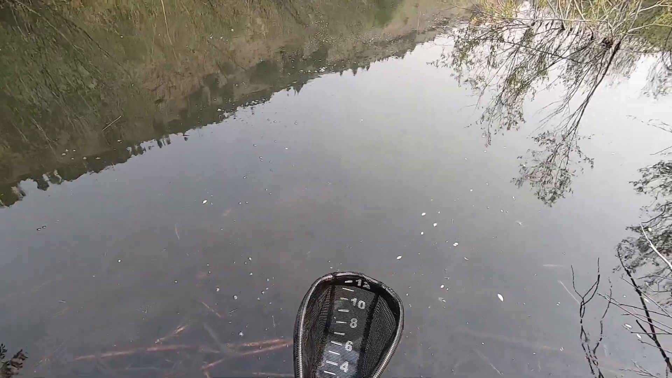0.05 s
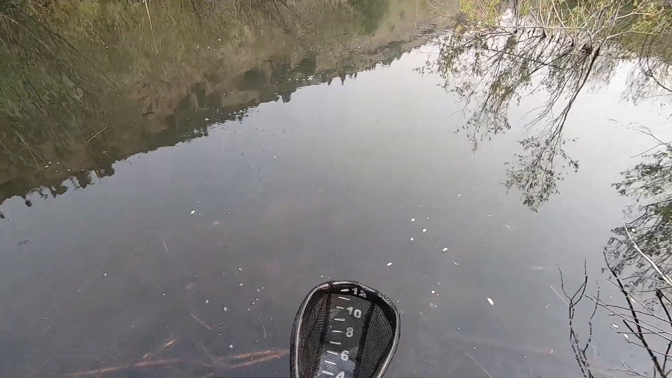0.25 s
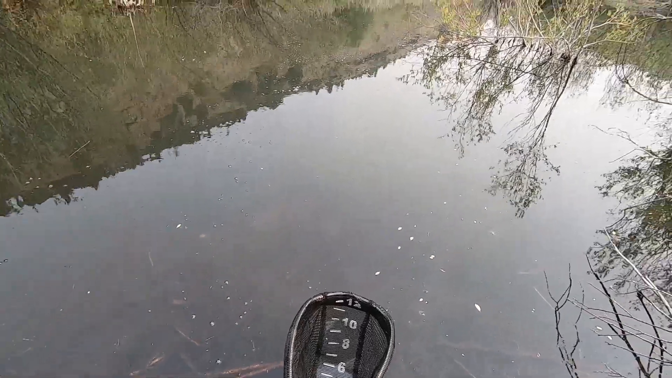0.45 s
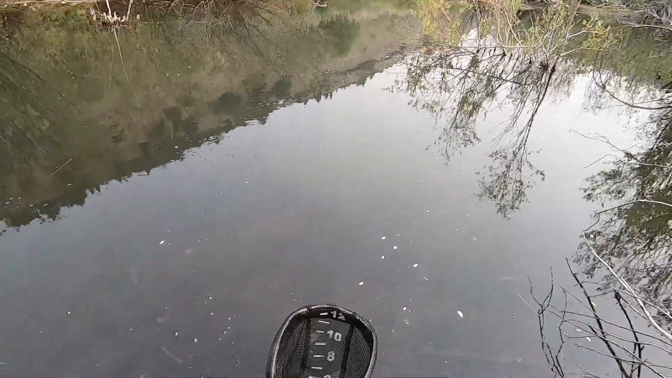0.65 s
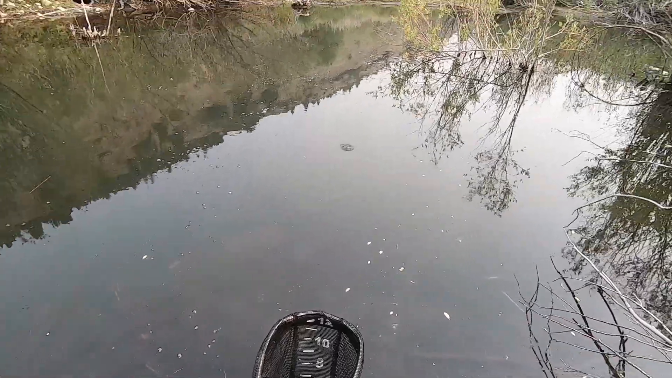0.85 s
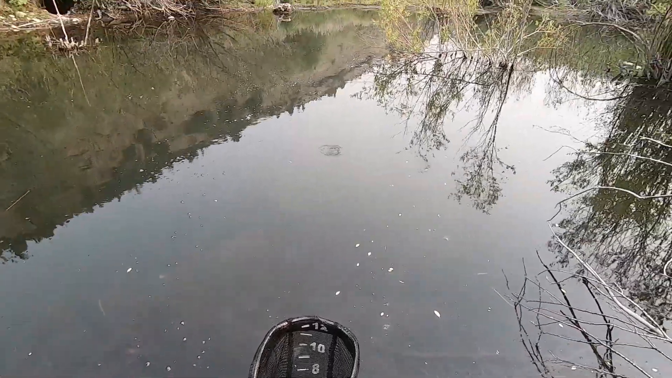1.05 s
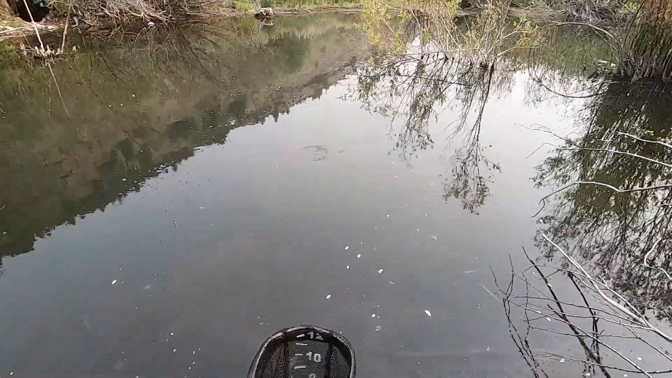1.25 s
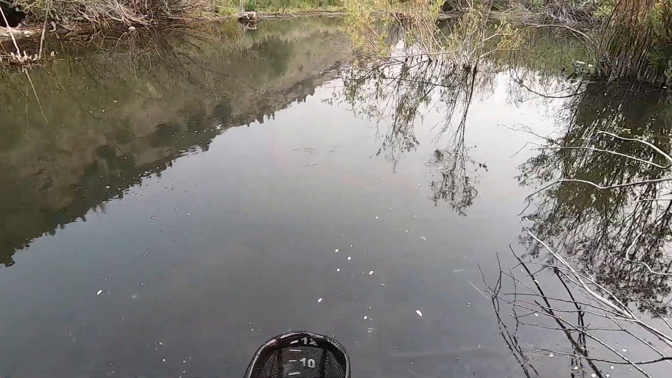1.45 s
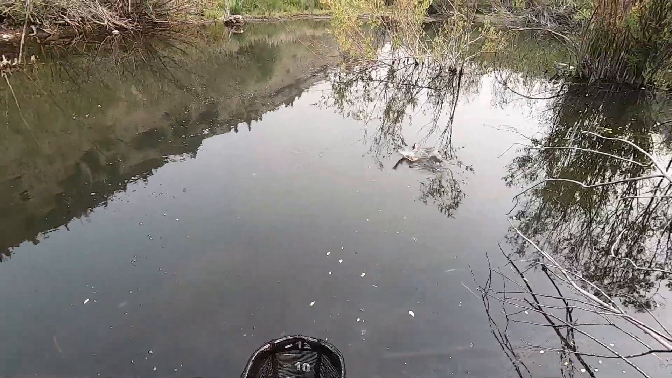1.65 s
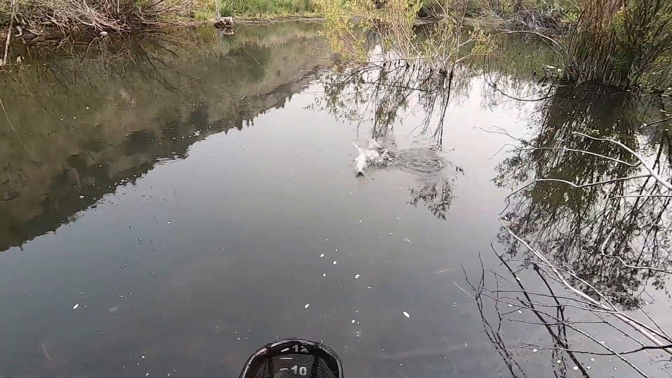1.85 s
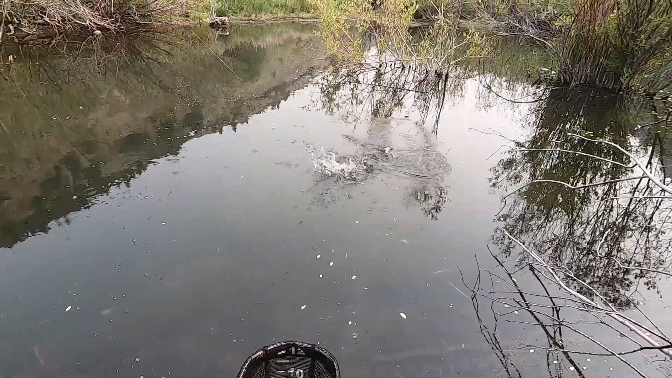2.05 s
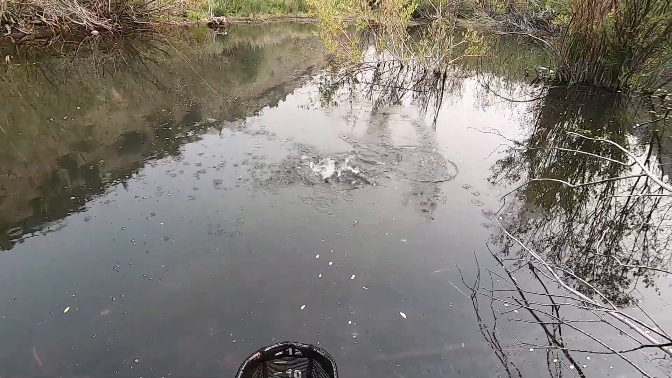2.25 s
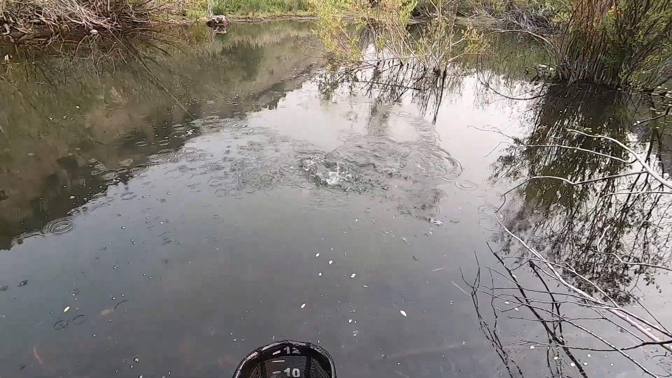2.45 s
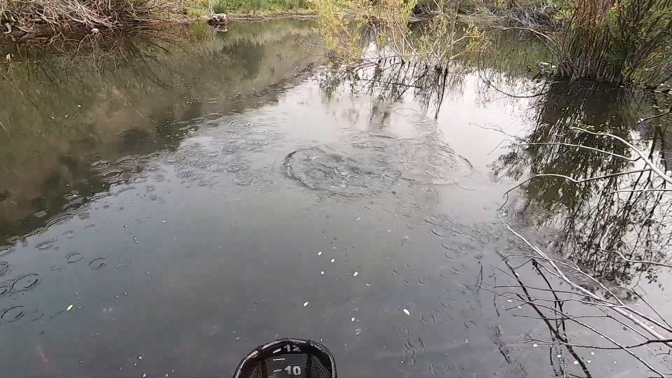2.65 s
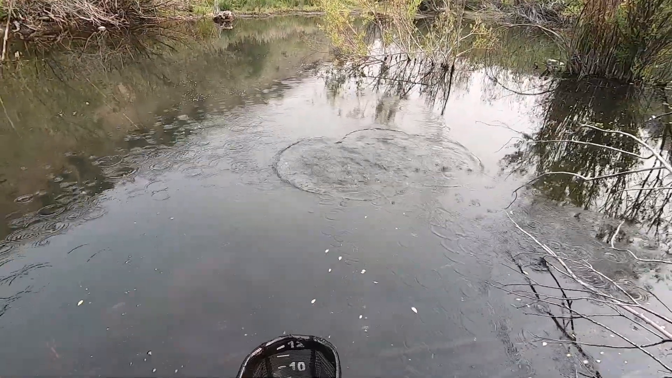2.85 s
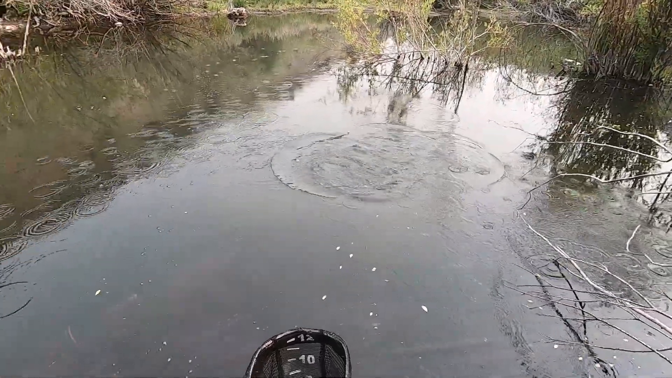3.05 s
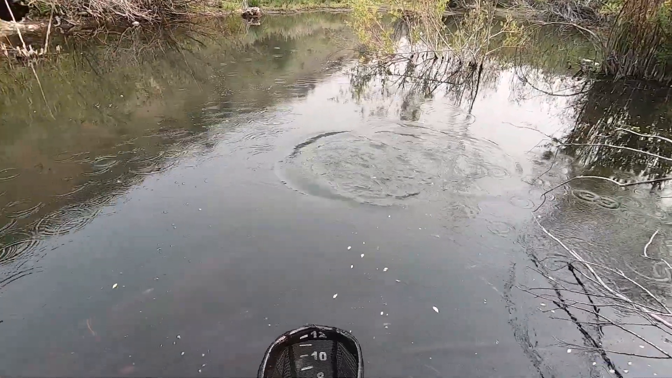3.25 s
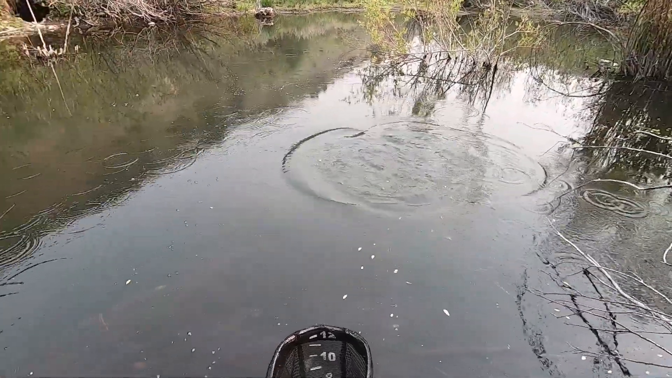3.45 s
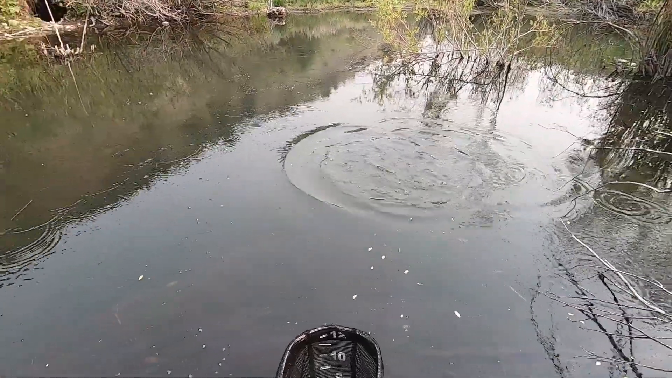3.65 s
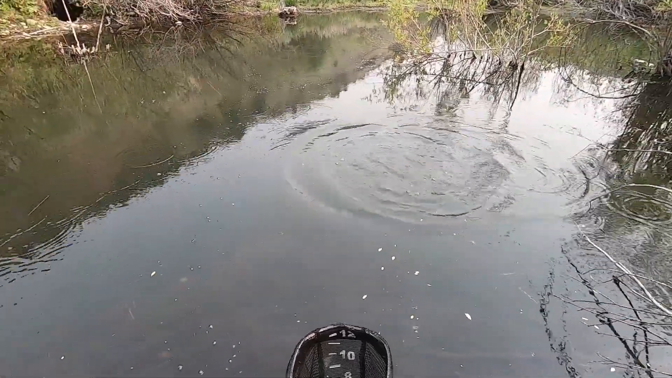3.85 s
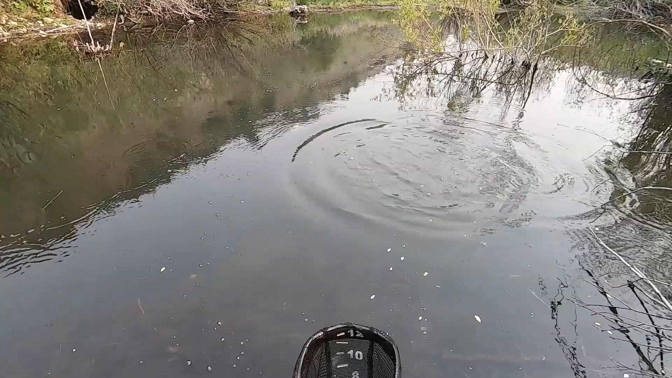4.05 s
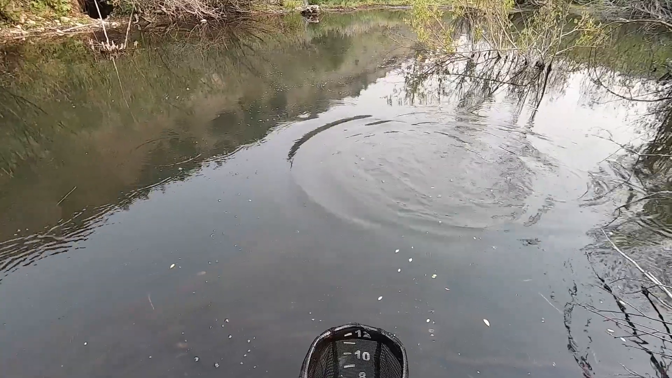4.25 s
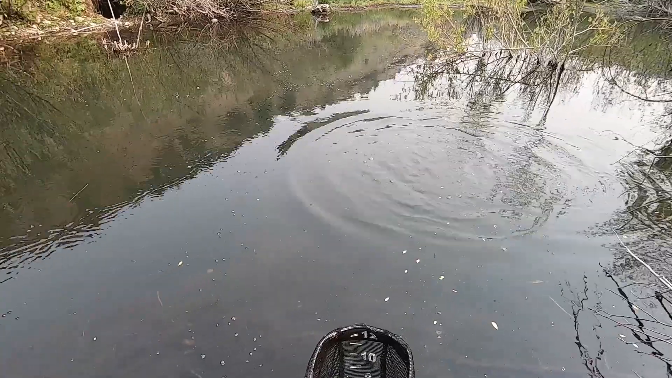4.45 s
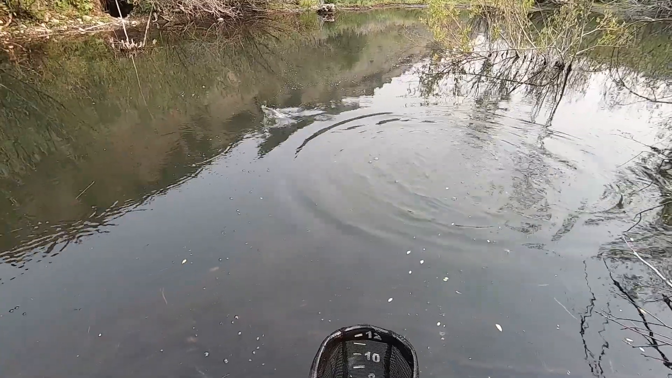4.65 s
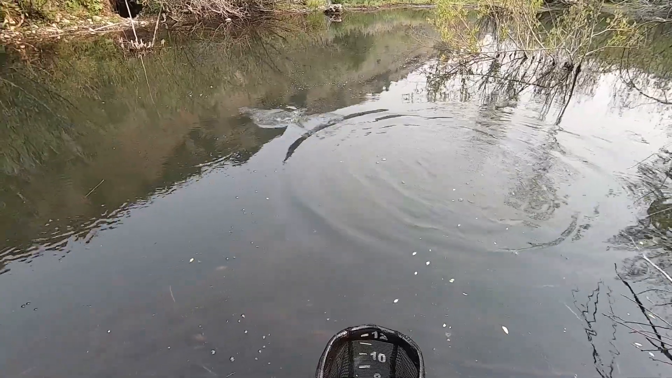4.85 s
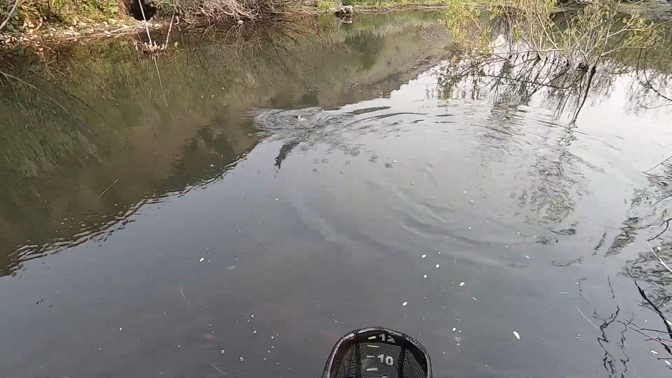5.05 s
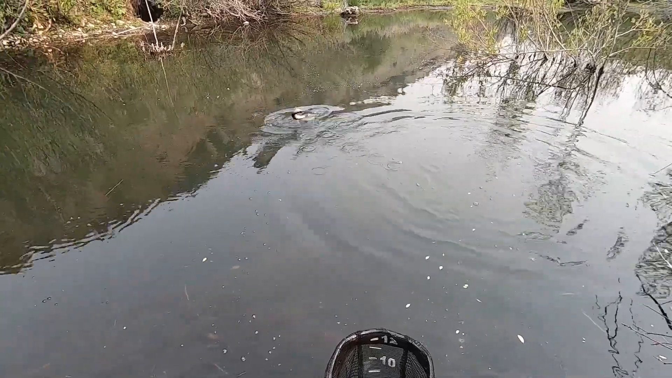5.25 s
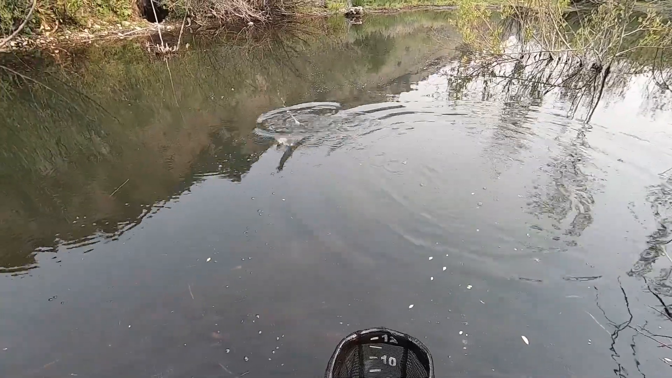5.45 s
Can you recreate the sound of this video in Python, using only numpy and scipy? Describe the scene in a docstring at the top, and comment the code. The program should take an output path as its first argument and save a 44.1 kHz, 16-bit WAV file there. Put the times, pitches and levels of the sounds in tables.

```python
"""A hooked fish thrashes at the surface of a small creek: ringing air pockets plop, noisy drops splash and patter.
An angler's strike snaps the tackle tight close by: a chord of short rings with a bright noise rattle.
A sleeve rustles and moving air rumbles on the microphone, both as shaped noise; the fish swirls once more, softer.
Far birds whistle in gliding tones, and the creek trickles between reedy banks as coloured noise and bubbles."""
import sys
import numpy as np
from scipy import signal
from scipy.fft import rfft, irfft, next_fast_len
from scipy.io import wavfile

SR = 44100
rng = np.random.default_rng(int(sys.argv[2]) if len(sys.argv) > 2 else 0)


def digitize_waveform(pressure):
    """Quantize a signal to 16-bit integers and store it at the path in sys.argv[1].

    Rows of a 2-D input are taken as channels; values are limited to [-1, 1].
    """
    field = np.atleast_2d(pressure).T
    bounded = np.clip(field, -1, 1)
    quanta = np.round(bounded * 32767).astype(np.int16)
    wavfile.write(sys.argv[1], SR, quanta)


N = 242707
TIME = np.arange(N) / SR
CUTOFF_HZ = 16000


def from_db(db):
    """Decibels to gain."""
    return 10 ** (np.asarray(db) / 20)


def rms_one(x):
    """Scale to rms 1."""
    return x / np.sqrt(np.mean(x ** 2) + 1e-20)


def add(out, s, sound):
    """Mix a sound in at time s."""
    at = max(round(s * SR), 0)
    out[at:at + len(sound)] += sound[:max(N - at, 0)]


def dying(t, t60):
    """Falls by 60 dB in t60."""
    return np.exp(-np.log(1000) * t / t60)


def colour(x, spectrum):
    """Filter x through a (Hz, dB) curve that falls 24 dB per octave beyond its ends; rms 1."""
    hz, db = np.transpose(spectrum)
    size = next_fast_len(N)
    octave = np.log2(np.maximum(np.fft.rfftfreq(size, 1 / SR), 1))
    outside = np.abs(octave - np.clip(octave, np.log2(hz[0]), np.log2(hz[-1])))
    gain = from_db(np.interp(octave, np.log2(hz), db) - 24 * outside)
    return rms_one(irfft(rfft(x, size) * gain, size)[:N])


def coloured_noise(spectrum):
    """Steady random noise through a (Hz, dB) curve; rms 1."""
    return colour(rng.standard_normal(N), spectrum)


def drops(per_s, spread_db, cycles, low_hz, high_hz, count=28):
    """Random drops of uneven size, each swelling and ringing at one of count bubble pitches; rms 1."""
    sizes = from_db(spread_db * np.minimum(rng.exponential(1, N), 3))
    sizes = sizes * rng.choice([-1, 1], N)
    clicks = sizes * (rng.random(N) < per_s / SR)
    dealt = rng.integers(0, count, N)
    out = np.zeros(N)
    for k, hz in enumerate(np.geomspace(low_hz, min(high_hz, CUTOFF_HZ), count)):
        r = dying(1 / SR, cycles / hz)
        w = 2 * np.pi * hz / SR
        resonance = [(1 - r * r) / 2, 0, -(1 - r * r) / 2, 1, -2 * r * np.cos(w), r * r]
        # two in a row make the ring swell before it dies; the tiny offset keeps the filter from stalling
        out += signal.sosfilt([resonance, resonance], clicks * (dealt == k) + 1e-18)
    return rms_one(out)


def scatter(x, t60, count=60):
    """Blurs a sound into many weak delayed copies, with about the energy of the sound itself."""
    delays = rng.uniform(.004, t60, count)
    echoes = np.zeros(int(t60 * SR) + 1)
    echoes[(delays * SR).astype(int)] = dying(delays, t60) * rng.standard_normal(count)
    return signal.fftconvolve(x, echoes / np.linalg.norm(echoes))[:N]


def swell(s, hold_s, attack_s, release_s):
    """Grows up to time s, holds at 1, then fades; attack and release are time constants."""
    growth = np.minimum(TIME - s, 0) / attack_s
    fade = np.maximum(TIME - s - hold_s, 0) / release_s
    return np.exp(growth - fade)


def spells(rows, attack_s, release_s, rest_db):
    """Gain over time for (s, length s, dB) rows: the strongest spell prevails, above a resting level."""
    gains = [from_db(db) * swell(s, length, attack_s, release_s) for s, length, db in rows]
    return np.hypot(from_db(rest_db), np.max(gains, axis=0))


# air pockets closing in the water: (time [s], relative peak level [dB], starting pitch [Hz], t60 [s])
PLOPS = [(1.097, -33.5, 770, 0.055), (1.578, -33.5, 794, 0.031), (1.684, -31.5, 1127, 0.065),
         (1.864, -31.5, 926, .04), (1.874, -25.5, 1400, .02), (1.974, -15.5, 925, .024),
         (2.089, -31.5, 1105, .07), (2.155, -25.5, 980, 0.047), (2.178, -15, 1087, 0.025),
         (2.185, -27, 189, .02), (2.218, -26.5, 302, 0.099), (2.237, -24.5, 465, 0.024),
         (2.252, -18.5, 650, 0.026), (2.274, -27, 720, .045), (2.2995, -20, 650, 0.024),
         (2.3, -30.5, 257, 0.089), (2.31, -20, 1310, .017), (2.319, -15.5, 950, .02),
         (2.324, -23.5, 750, 0.05), (2.4, -27, 514, 0.063), (2.424, -23, 760, 0.028),
         (2.868, -37.5, 580, 0.084), (4.008, -35.5, 602, 0.077), (4.69, -36, 535, 0.062),
         (4.7275, -24, 800, 0.0094), (4.728, -36, 326, .14)]
PLOP_RISE_OCT_PER_S = 5.4


def plops(closing_share=0.023):
    """A trapped pocket of air rings and rises in pitch as it nears the surface; long ringers close more slowly."""
    out, t = np.zeros(N), TIME[:SR // 6]
    for s, db, hz, t60 in PLOPS:
        pitch = hz * 2 ** (PLOP_RISE_OCT_PER_S * t)
        envelope = (1 - np.exp(-t / (closing_share * t60))) ** 2 * dying(t, t60)
        ring = np.sin(2 * np.pi * np.cumsum(pitch) / SR)
        add(out, s, from_db(db - 2) * envelope / envelope.max() * ring)
    return out


# tail slaps that throw water: (time [s], relative level [dB], fine mist relative to the slap [dB])
SLAPS = [(1.618, -40.5, -23), (1.676, -40, -20), (1.722, -38, -12), (1.8727, -28, -4), (1.974, -34, 5),
         (2.116, -33, -12), (2.154, -43.5, 9.5), (2.1948, -40, -1), (2.215, -37, -10), (2.3, -30.5, 0),
         (2.334, -39.5, 11), (2.4234, -26, 1.5), (2.4667, -33.5, -4), (2.561, -37, 2), (4.722, -36.5, -10),
         (4.797, -42.5, -19), (4.89, -39.5, -9), (5.154, -41, -10)]
# bouts of thrashing that throw spray: (time [s], length [s], relative level [dB])
THRASHES = [(1.67, .2, -50.5), (1.95, 0.16, -44), (2.2, .25, -42), (4.68, 0.21, -55.5), (5.3, 0.22, -55.5)]
# tone curve of coarse splash, mist and patter: (frequency [Hz], level [dB])
SPRAY = [(250, -13), (600, 1.5), (1200, 5), (1800, 2), (2500, 6), (3700, -0.5), (5000, -2.5), (8000, 1),
         (11000, -5), (16000, -14)]
SLAP_T60_S = .042
# time constants: drops go up quickly and take longer to fall back; a little patter always goes on
SPRAY_ATTACK_S, SPRAY_RELEASE_S, RESTING_PATTER_DB = 0.064, 0.14, -60.5


def splashing():
    """Slaps tear the surface into coarse bubbles and fine mist; thrown drops patter and churned water gurgles."""
    slap, spray, t = np.zeros(N), np.zeros(N), TIME[:SR // 5]
    for s, db, mist_db in SLAPS:
        burst = from_db(db) * (1 - np.exp(-t / 0.00026)) * dying(t, SLAP_T60_S)
        add(slap, s, burst)
        add(spray, s, from_db(mist_db) * burst)
    coarse = colour(drops(per_s=6500, spread_db=2.0, cycles=8.5, low_hz=348, high_hz=4920), SPRAY)
    mist = colour(drops(per_s=7200, spread_db=3.5, cycles=3.8, low_hz=4500, high_hz=14300), SPRAY)
    patter = colour(drops(per_s=2600, spread_db=5.2, cycles=14, low_hz=900, high_hz=15000, count=48), SPRAY)
    plips = drops(per_s=420, spread_db=5, cycles=17, low_hz=1200, high_hz=4600)
    churn = drops(per_s=700, spread_db=3.5, cycles=10.5, low_hz=396, high_hz=1400)
    falling = from_db(-1.0) * patter + from_db(-6) * plips + from_db(-1.5) * churn + from_db(-10.5) * mist
    thrashing = spells(THRASHES, SPRAY_ATTACK_S, SPRAY_RELEASE_S, RESTING_PATTER_DB)
    return from_db(1.0) * slap * coarse + from_db(-4) * spray * mist + thrashing * falling


# snaps and ticks of the tackle: (time [s], relative level [dB], brightness [dB per octave])
SNAPS = [(1.208, -43.5, 11), (1.7602, -22.5, 0), (1.8271, -19, 9.5), (1.9073, -35.5, 6), (1.9403, 1, 0.5),
         (2.1149, -23.5, 3.5), (2.845, -38, -3), (3.1925, -34.5, 2), (3.2272, -42, 0), (3.232, -31.5, -4),
         (3.3593, -36.5, -2), (3.385, -38, 14), (3.399, -40, 11)]
# what the tackle rings with: (frequency [Hz], relative level [dB], t60 [s])
TACKLE_MODES = [(178, -32, 0.014), (450, -32, 0.023), (774, -18, 0.0069), (1290, -32, 0.016),
                (2376, -16.5, 0.012), (3010, -18.5, 0.008), (3890, -0.5, 0.0047), (5010, -2.5, 0.0053),
                (6130, -2, 0.0048), (7240, -5.5, 0.006), (8310, -3.5, 0.0048), (9400, -7.5, 0.0059),
                (10570, -9, 0.0044), (12060, -17, 0.0079), (13060, -32, 0.0037), (14500, -21, .0045)]
# tone curve of the rattle: (frequency [Hz], level [dB])
RATTLE = [(1500, -18), (3000, -11.5), (5000, -10), (8000, -5), (11000, -14.5), (16000, -22)]
RATTLE_DB, RATTLE_T60_S = -23, 0.15   # after a 0 dB snap
# share of a snap's level that the rattle follows; drop in snap level that halves the rattle's length
RATTLE_FOLLOWS, RATTLE_HALVES_DB = 0.51, 22


def tackle():
    """Each snap runs down the rod, treble ahead of bass; a harder one leaves a louder, longer bright rattle."""
    out, shake, t = np.zeros(N), np.zeros(N), TIME[:SR // 4]
    for s, db, brightness_db in SNAPS:
        for k, (hz, mode_db, t60) in enumerate(TACKLE_MODES):
            travel_s = .00055 * np.sqrt(4000 / max(hz, 2000))
            gain = from_db(db + mode_db + brightness_db * np.log2(hz / 6000))
            ring = np.sin(2 * np.pi * hz * t) * dying(t, t60) * (1 - np.exp(-t / 0.00033))
            add(out, s + travel_s, 2 * (-1) ** k * gain * ring)   # neighbouring modes alternate in sign
        rattle_t60 = RATTLE_T60_S * 2 ** (db / RATTLE_HALVES_DB)
        envelope = dying(t, rattle_t60) * (1 - np.exp(-t / 0.0012))
        add(shake, s, from_db(RATTLE_DB + RATTLE_FOLLOWS * db) * envelope)
    return out + shake * coloured_noise(RATTLE)


# strokes of the sleeve: (peak time [s], attack time constant [s], level [dB])
BRUSHES = [(3.37, .13, -48.5), (3.456, 0.028, -37), (3.628, 0.03, -42)]
# tone curve of the cloth: (frequency [Hz], level [dB])
SLEEVE = [(2000, -11), (3500, -10), (5300, 6), (7000, -3), (9000, 1), (11300, 4.5), (13000, -9),
          (16000, -6)]
BRUSH_HOLD_S, BRUSH_RELEASE_S = 0.0057, 0.017   # each stroke stops short


def sleeve_rustle():
    """Rubbing cloth is bright noise that grows with each stroke and stops short."""
    rubbing = sum(from_db(db) * swell(s, BRUSH_HOLD_S, attack_s, BRUSH_RELEASE_S)
                  for s, attack_s, db in BRUSHES)
    return rubbing * coloured_noise(SLEEVE)


# gusts on the microphone: (time [s], length [s], level [dB])
GUSTS = [(1.5, 0.2, -33.5), (1.88, 0.33, -27.5), (2.52, 0.62, -25), (3.35, 0.044, -35)]
# tone curve of their rumble: (frequency [Hz], level [dB])
RUMBLE = [(10, -3), (16, 1.5), (25, -17), (40, -20.5), (63, -43.5), (100, -37.5), (200, -92)]
GUST_ATTACK_S, GUST_RELEASE_S, CALM_AIR_DB = 0.12, 0.049, -47.5   # time constants; level between gusts


def moving_air():
    """Air pushing on the microphone is deep noise that swells with each gust."""
    return spells(GUSTS, GUST_ATTACK_S, GUST_RELEASE_S, CALM_AIR_DB) * coloured_noise(RUMBLE)


# far birds, one glide a row: (time [s], length [s], start [Hz], end [Hz], relative level [dB])
WHISTLES = [(0.432, .025, 1560, 1695, -40), (0.542, 0.024, 1450, 1435, -43),
            (0.718, 0.15, 1581, 1355, -42.5), (0.862, 0.055, 1420, 1853, -38.5),
            (2.659, .3, 1719, 1093, -44.5), (3.125, 0.066, 1236, 1260, -38), (3.2, .04, 1260, 1330, -36.5),
            (3.462, .045, 1510, 1353, -38.5), (3.99, .1, 1797, 2570, -51), (4.01, .09, 1014, 1310, -47),
            (4.088, 0.044, 1666, 1900, -40), (4.27, 0.25, 1437, 1297, -45)]
GLIDE_BEND, OVERTONE_DB = 1.5, -17.5   # curvature of every glide (1 = even); level of its octave


def birds():
    """Wavering fluted glides, steepest at their high end, flutter in level and are blurred by trees on their way."""
    out = np.zeros(N)
    wobble = 1 + .035 * coloured_noise([(30, 0), (200, -3)])
    flutter = from_db(1.8 * coloured_noise([(20, 0), (120, -3)]))
    for s, length, start_hz, end_hz, db in WHISTLES:
        along = np.linspace(0, 1, int(length * SR))
        low_hz, high_hz = sorted((start_hz, end_hz))
        height = (along if end_hz > start_hz else 1 - along) ** GLIDE_BEND
        pitch = low_hz * (high_hz / low_hz) ** height * wobble[int(s * SR):][:len(along)]
        phase = 2 * np.pi * np.cumsum(pitch) / SR
        tone = np.sin(phase) + from_db(OVERTONE_DB) * np.sin(2 * phase)
        breath = np.sqrt(np.abs(np.sin(np.pi * along)))
        add(out, s, from_db(db) * breath * tone)
    return from_db(-1.0) * out * flutter + from_db(-5.0) * scatter(out, t60=.2)


# tone curve of the steady creek: (frequency [Hz], level [dB])
CREEK = [(35, -13), (60, 5.5), (96, -3), (140, 3), (300, -2.5), (440, 0), (750, -1), (1100, -1.5),
         (1600, -4), (2300, -9.5), (3000, -14.5), (7750, -18), (11300, -20.5), (16000, -30.5)]
CREEK_DB = -47


def creek():
    """A wash of distant running water with small nearer bubbles in it."""
    wash = coloured_noise(CREEK)
    gurgle = drops(per_s=260, spread_db=4.5, cycles=16, low_hz=330, high_hz=2400, count=40)
    trickle = drops(per_s=140, spread_db=5.5, cycles=22, low_hz=1600, high_hz=7500)
    water = from_db(-0.5) * wash + from_db(-5.0) * colour(gurgle, CREEK) + from_db(-21.5) * trickle
    return from_db(CREEK_DB) * water


# tone curve of a very faint added noise, opposite in the two channels: (frequency [Hz], level [dB])
SIDE_NOISE = [(60, -3), (300, 3.5), (1500, -18.5), (6000, -8.5), (12000, -1), (16000, 0)]


def scene():
    """Both channels are nearly alike; a very faint noise and blurred copies of the sounds differ between them."""
    fish = plops() + splashing()
    snaps = tackle()
    sleeve = sleeve_rustle()
    fish_echoes = from_db(-12.5) * scatter(fish, t60=.18)   # off banks and bushes
    mid = fish + fish_echoes + snaps + sleeve + moving_air() + birds() + creek()
    blurred_copies = scatter(from_db(-51.5) * (fish + sleeve) + from_db(-37) * snaps, t60=.03)
    side = from_db(-80.5) * coloured_noise(SIDE_NOISE) + blurred_copies
    return np.array([mid + side, mid - side])


def record(dry):
    """Peaks beyond full scale are clipped flat, then the treble above the cutoff is removed."""
    lowpass = signal.ellip(10, .1, 70, CUTOFF_HZ, fs=SR, output="sos")
    return signal.sosfilt(lowpass, np.clip(dry, -1, 1))


dry = scene()
out = record(dry)
digitize_waveform(out)
```